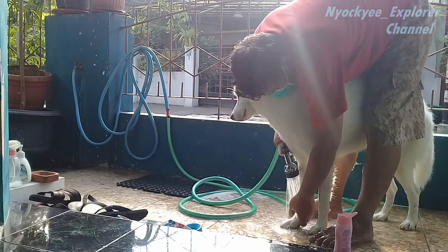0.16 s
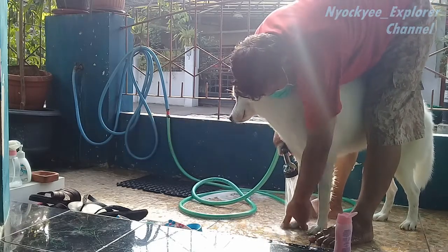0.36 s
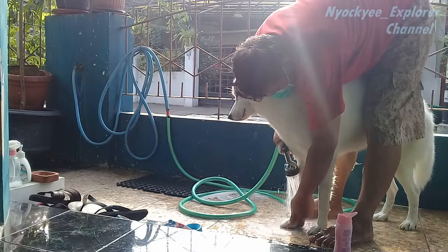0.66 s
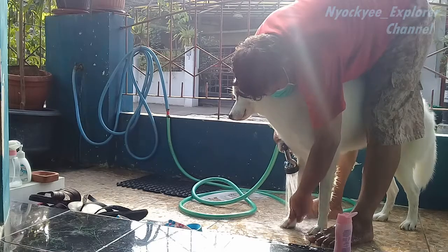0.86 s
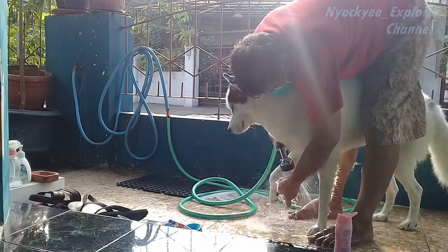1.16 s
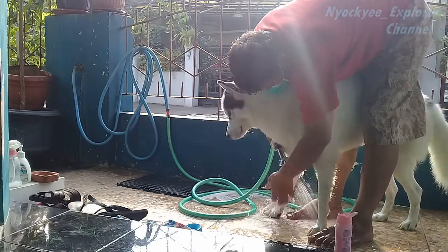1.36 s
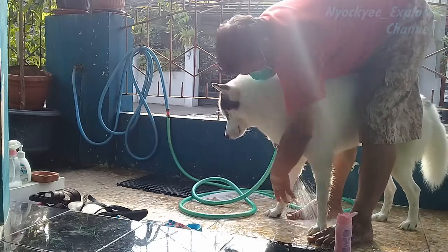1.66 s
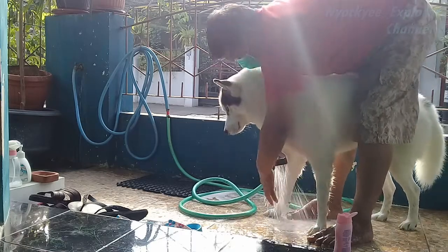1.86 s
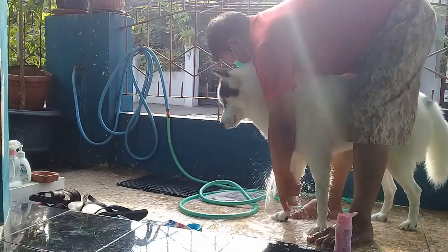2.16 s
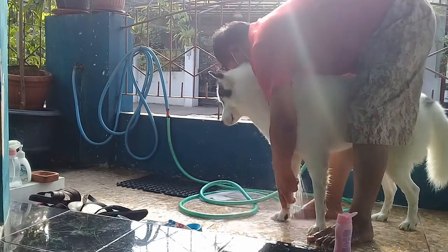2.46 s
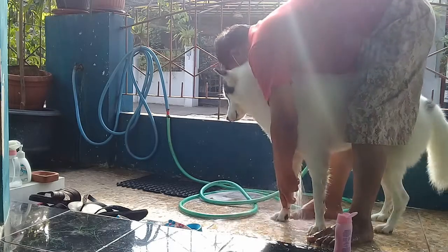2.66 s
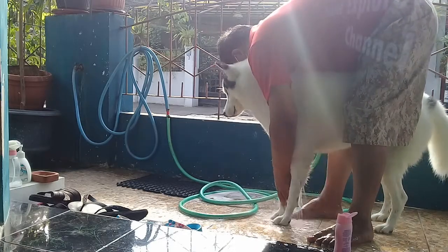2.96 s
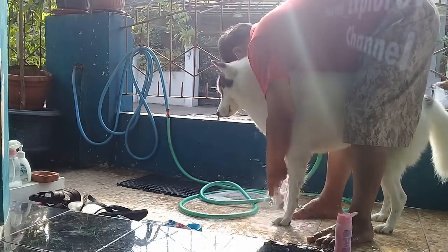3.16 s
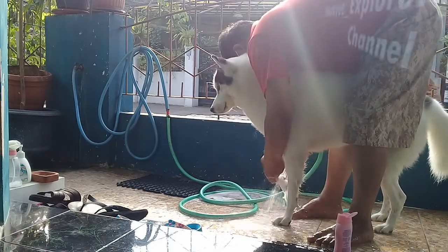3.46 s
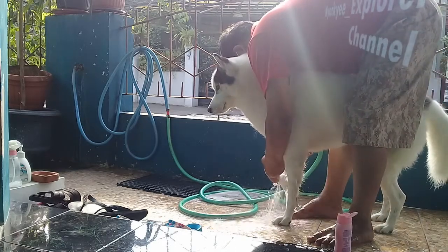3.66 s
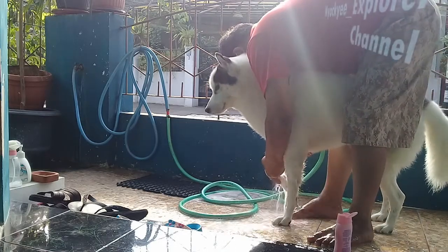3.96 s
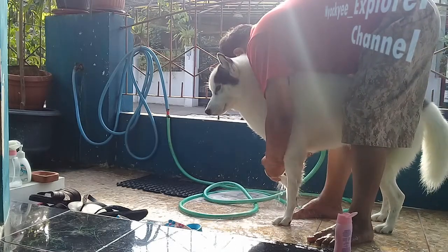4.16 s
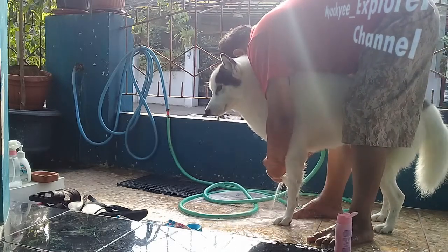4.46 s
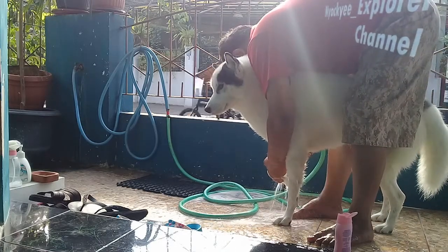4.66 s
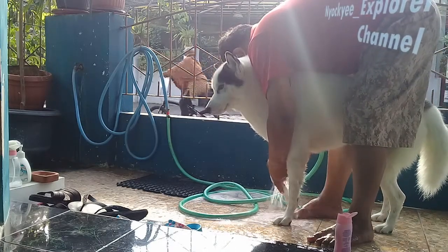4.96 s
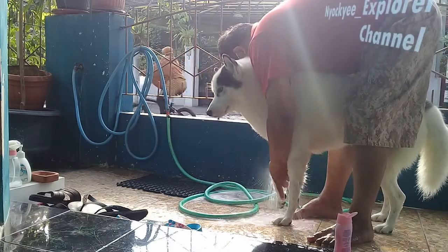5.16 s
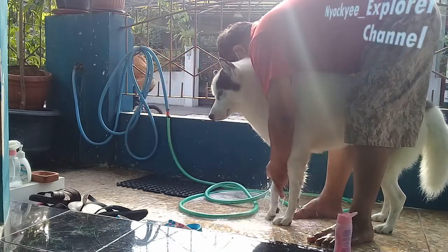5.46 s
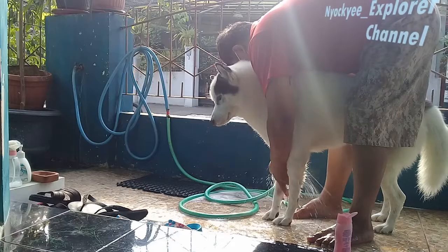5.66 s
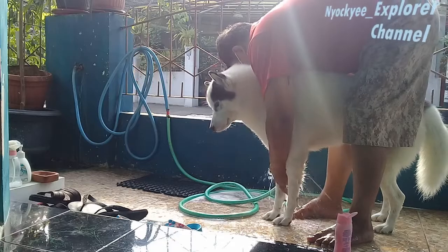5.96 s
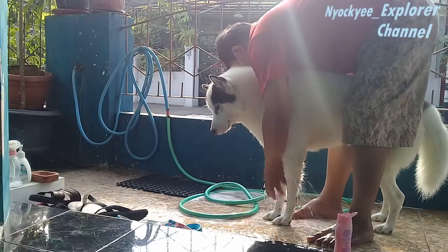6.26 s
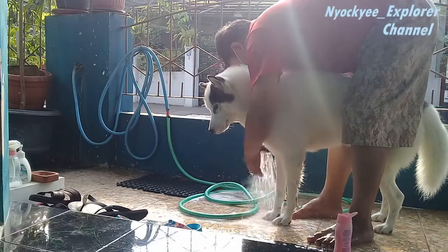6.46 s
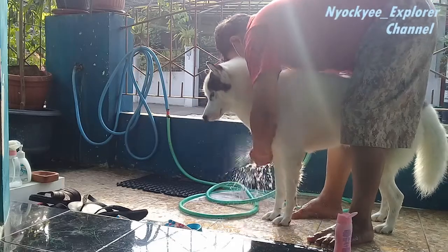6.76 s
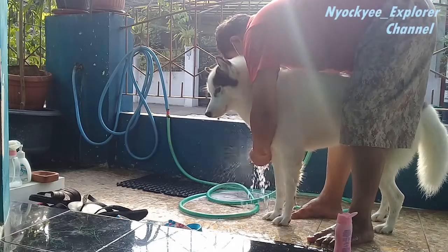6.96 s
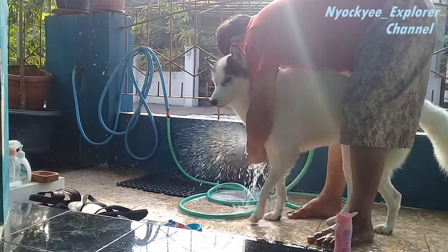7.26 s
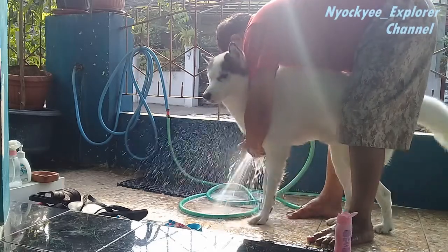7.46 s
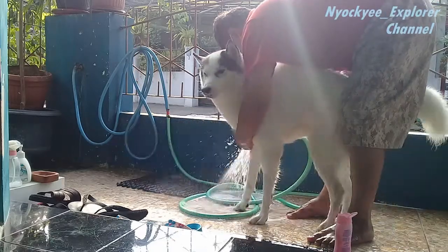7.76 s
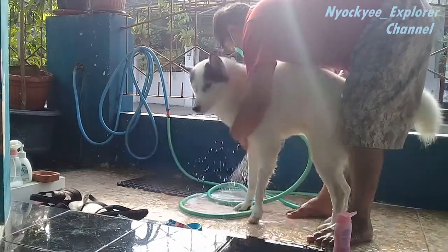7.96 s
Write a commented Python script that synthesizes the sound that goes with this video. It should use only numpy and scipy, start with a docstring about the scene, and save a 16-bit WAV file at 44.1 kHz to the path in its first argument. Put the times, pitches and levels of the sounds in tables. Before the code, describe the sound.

A hose sprays a dog's legs on a tiled terrace. Fine hiss and dense bubbly drops run throughout, with low gurgles early on, a quieter stretch around two seconds, then fuller pouring and plinking trickles. Sharp wet slaps crowd together in the last second or so. Far traffic rumble and a faint steady pump hum lie underneath. One fairly close microphone, centred, in a slightly reflective outdoor space.

```python
"""A tiled terrace above street rumble: a hose sprays a dog's legs, heard at one microphone while a pump hums.
The spray is ticking noise in bands; drops on the wet tiles, gurgles off the fur and trickles are ringing bubbles.
Water slaps down as a crack, a plink and a scattered ringing above it; single drops snap on stone.
Noise bands and drones make the far street, a wavering sine the pump.
The sound drops out once for a fiftieth of a second."""
import sys
import numpy as np
from scipy import signal
from scipy.io import wavfile

SR = 44100
rng = np.random.default_rng(int(sys.argv[2]) if len(sys.argv) > 2 else 0)


def boost(x):
    """Linear amplitude factor 10**(x/20) for a level x in decibels (scalar or array-like)."""
    u = np.asarray(x, float) / 20
    return 10 ** u


def digitize_waveform(pressure):
    """Quantize a signal to 16-bit integers and store it at the path in sys.argv[1].

    Rows of a 2-D input are taken as channels; values are limited to [-1, 1].
    """
    field = np.atleast_2d(pressure).T
    bounded = np.clip(field, -1, 1)
    quanta = np.round(bounded * 32767).astype(np.int16)
    wavfile.write(sys.argv[1], SR, quanta)


N = 357651

# Fine spray: start_s, level_db, tilt_db_per_octave
SPRAY = [(0, -49, -2), (.2, -50.5, -1), (.45, -53.5, 2), (.65, -50, -0.5), (1.08, -49, 2), (1.2, -46.5, -2),
         (1.44, -49.5, 0.5), (1.62, -51, 0), (1.76, -46, -1), (1.92, -42.5, 2), (2.05, -46.5, 0.5),
         (2.14, -48, 5), (2.22, -50.5, 2), (2.31, -47, 2), (2.39, -46.5, 1.5), (2.5, -49, -1),
         (3.07, -47, 0), (3.26, -49.5, -1.5), (3.34, -44, 1), (4.0, -44, 0), (4.18, -46.5, 0),
         (5.05, -44, -1.5), (5.25, -46.5, -2), (5.35, -51, -1), (5.55, -53, -1), (5.7, -52, 0.5),
         (5.88, -50.5, -3.5), (6.1, -50.5, -3), (6.3, -48, -3), (6.35, -50, -2.5), (6.37, -52.5, -3),
         (6.4, -50.5, -4), (6.5, -47.5, -0.5), (6.75, -53, -0.5), (7.05, -48, -3.5), (7.3, -51.5, 2),
         (7.48, -48, -3.5), (7.57, -43, 2.5), (7.72, -46, 1.5), (7.8, -42.5, -2), (8.02, -50, -2),
         (8.08, -55.5, -1.5)]
# Colour of the spray: pitch_hz, level_db_per_hz
SPRAY_COLOUR = [(1400, -14), (2370, -2), (3000, -7), (3570, -5.5), (5070, -2), (6800, -4), (8670, -4),
                (9740, -1), (15400, -5)]
# Drops bursting on the tiles: start_s, level_db, middle_pitch_hz, spread_octaves
DROPS = [(0, -53.5, 3640, 0.28), (.18, -56.5, 3060, 0.59), (.29, -47.5, 2400, 1.4),
         (.45, -53.5, 2250, 0.88), (.61, -51.5, 3580, 0.5), (.9, -54, 3200, 0.93), (1.04, -46.5, 2600, 1.4),
         (1.14, -56, 3580, 0.96), (1.45, -51, 3480, 0.7), (1.62, -52.5, 3380, 0.57),
         (1.95, -56, 4200, 0.54), (2.22, -51, 2720, 0.71), (2.39, -53.5, 4070, 1), (2.62, -49, 3020, 0.65),
         (3.1, -52, 3430, .65), (3.24, -52.5, 2720, 0.65), (3.33, -46.5, 2720, 0.6),
         (3.43, -43.5, 2600, 0.73), (3.66, -46.5, 2660, 0.79), (3.95, -47, 3000, 0.67),
         (4.18, -47, 3200, 0.65), (4.7, -46.5, 2980, 0.53), (5.17, -47, 3800, 0.54), (5.3, -54, 3300, 0.44),
         (5.5, -55.5, 2570, 0.84), (5.9, -53, 2900, 1.1), (6.15, -51.5, 3600, 1.3), (6.33, -52, 3000, .8),
         (6.37, -56, 2800, .6), (6.4, -53.5, 2820, 0.66), (6.58, -52.5, 4300, 0.42),
         (6.75, -63, 3950, 0.53), (6.9, -52.5, 3680, 0.42), (7.04, -51, 3380, 0.37),
         (7.15, -50, 3240, 0.41), (7.3, -53, 3550, 0.77), (7.48, -54.5, 3280, 0.79),
         (7.54, -51.5, 3700, 0.64), (7.68, -50.5, 3820, 0.71), (7.81, -46.5, 3800, 0.31),
         (8.02, -53, 3630, 0.39), (8.07, -65, 3400, 0.5)]
# Thick water running off the fur: start_s, level_db, middle_pitch_hz, spread_octaves
GURGLE = [(0, -54.5, 1380, 0.43), (.2, -56, 1350, 0.2), (.27, -49.5, 1450, .35), (.37, -46, 1490, 0.27),
          (.47, -53, 1390, 0.36), (.63, -57, 1320, 0.18), (.74, -61.5, 1330, 0.65), (.9, -60.5, 1260, 1),
          (1.05, -55.5, 1110, 0.54), (1.13, -58.5, 1340, .35), (1.26, -67, 1540, 0.23),
          (1.4, -62, 1490, 0.21), (1.7, -65.5, 1500, 0.26), (2.0, -62, 1460, 0.18), (2.33, -62.5, 1480, .3),
          (2.41, -56.5, 1420, 0.18), (2.55, -56.5, 1500, 0.34), (3.29, -62.5, 1480, 0.33),
          (3.39, -50, 1550, 0.6), (3.57, -51, 1590, 0.76), (3.92, -50.5, 1520, 0.34),
          (4.15, -56.5, 1410, 0.65), (4.88, -55, 1460, 0.29), (5.0, -52, 1600, 0.54),
          (5.1, -58, 1480, 0.24), (5.35, -54, 1510, 0.56), (5.62, -60, 1320, 0.71), (5.72, -56, 1490, 1),
          (6.05, -61, 1450, 0.6), (6.36, -58.5, 1400, 0.6), (6.43, -61.5, 1580, 0.26),
          (6.7, -67, 1610, 0.13), (7.35, -64.5, 1600, 0.25), (7.72, -69.5, 1560, 0.54),
          (7.85, -59, 1540, 0.45), (8.08, -73, 1330, 0.86)]
# Far traffic: start_s, level_db
TRAFFIC = [(0, -54), (.6, -52), (1.3, -53), (2.7, -53.5), (3.6, -53), (4.2, -53), (5.7, -55), (6.3, -54.5),
           (7.5, -54), (8.11, -53.5)]
# Colour of the street rumble: pitch_hz, level_db_per_hz
RUMBLE = [(25, -22), (38, 5), (49, -36), (62, -2), (75, 0.5), (107, 4), (200, -5), (240, -7.5), (300, -9),
          (440, -10.5), (580, -18.5), (800, -24), (1300, -54)]
# Drones in the street: pitch_hz, width_hz (each rings 5 / width seconds), level_db beside the rumble
DRONES = [(101.2, 8.5, -8.5), (298.3, 8.8, -17), (339.6, 9.1, -23)]
# Pump hum: start_s, pitch_hz, level_db
PUMP = [(0, 386.3, -54.5), (2.5, 387.1, -56), (5.6, 386.9, -55.5), (6.8, 386.2, -54), (8.11, 387.4, -53.5)]
# Trickles pouring into one hollow each: middle_s, half_length_s, pitch_hz, level_db at the middle
TRICKLES = [(.3, 0.1, 1100, -53.5), (0.27, 0.04, 1600, -55), (0.38, 0.036, 2250, -58),
            (0.12, 0.087, 1420, -62), (0.35, .05, 1600, -57), (.27, 0.044, 2300, -58),
            (0.4, 0.033, 1700, -58), (0.48, .04, 1450, -59), (.49, .02, 2280, -58),
            (.605, .008, 1290, -50.5), (0.63, 0.044, 1300, -64), (0.78, 0.18, 830, -70),
            (1.043, 0.03, 830, -57), (1.01, 0.048, 1280, -57), (1.32, 0.016, 1500, -57.5),
            (1.9, .1, 1450, -67), (2.03, 0.037, 1350, -62), (2.42, 0.038, 1400, -60),
            (3.8, 0.036, 2900, -51), (3.46, 0.043, 1970, -52), (3.5, 0.027, 1300, -54),
            (3.55, 0.03, 1800, -51), (3.63, 0.056, 2100, -49.5), (3.62, 0.033, 4300, -51),
            (3.76, .025, 4550, -53), (3.81, .02, 4350, -51), (3.9, .03, 2150, -50.5),
            (3.96, .03, 4300, -54), (4.88, .03, 2300, -51.5), (4.98, 0.028, 1680, -50),
            (5.44, 0.14, 1510, -61), (5.73, 0.054, 1650, -57.5), (5.8, 0.22, 2420, -63),
            (5.86, .3, 1620, -68), (5.8, .25, 3400, -71), (5.4, 0.18, 870, -68), (5.82, .05, 3380, -64),
            (6.01, 0.023, 2200, -56), (6.348, .01, 2040, -47), (6.65, .2, 1530, -69.5),
            (6.6, 0.025, 860, -67), (5.5, 0.018, 2100, -62), (5.3, .04, 2430, -62), (6.8, .06, 3700, -58)]
# Slaps of water, some followed by an early echo in a row of its own:
# start_s, peak_db, plink_pitch_hz, crack_db beside the peak
SLAPS = [(.163, -36, 2400, -22), (.237, -35, 2330, -24), (.303, -32, 2600, -22), (.385, -35, 2200, -22),
         (.578, -35, 2150, -22), (1.268, -33, 4000, -15), (1.272, -37, 5500, -20), (1.3093, -33, 2170, -1),
         (1.377, -27, 5200, -17), (1.393, -35, 3430, -18), (1.429, -32, 3450, -15), (1.485, -33, 2500, -5),
         (1.545, -32, 2600, -19), (1.63, -36, 3620, -4), (1.695, -36, 2350, -19), (1.79, -29, 3120, -14),
         (1.841, -27, 5380, -16), (2.116, -33.5, 2100, -11), (2.597, -26, 3900, -20),
         (2.5995, -27.5, 3500, -24), (2.6017, -29, 3950, -24), (2.912, -31, 4300, -16),
         (3.143, -26, 2630, -16), (3.161, -29, 2550, -20), (3.2605, -34.5, 2670, -18),
         (3.367, -27, 4900, -18), (3.57, -35, 4270, -14), (3.711, -23, 3350, -11), (3.73, -29, 3900, -12),
         (5.008, -29, 3600, -12), (5.095, -33, 2950, -18), (5.124, -30, 2750, -18), (5.171, -24, 3330, -13),
         (5.173, -30, 2650, -18), (5.195, -31, 3430, -20), (5.271, -27, 3600, -12),
         (5.5904, -32, 2460, -14), (5.912, -33, 5300, -10), (5.9298, -25.5, 2700, -9),
         (5.9355, -32, 5200, -12), (5.946, -36, 2850, -18), (5.951, -40, 2350, -18),
         (5.984, -39, 2650, -18), (6.071, -28.5, 4300, -10), (6.104, -33, 4100, -14),
         (6.1605, -27, 3380, -12), (6.319, -30, 2080, -16), (6.34, -31, 2090, -22), (6.412, -30, 5300, -12),
         (6.413, -35, 3000, -11), (6.433, -33, 5000, -14), (6.587, -31, 5300, -8), (6.795, -28, 4500, -10),
         (6.826, -26, 3790, -23), (7.025, -34, 3120, -16), (7.031, -38, 4220, -15), (7.072, -24, 3000, -16),
         (7.079, -20, 3050, -17), (7.082, -26, 3100, -7), (7.095, -28, 3000, -20), (7.1112, -19, 3360, -16),
         (7.1165, -26, 3680, -12), (7.13, -34, 3500, -20), (7.145, -27, 3300, -20),
         (7.1932, -25.5, 6700, -5), (7.193, -34, 1750, -20), (7.2265, -35, 4600, -8),
         (7.292, -34, 2400, -15), (7.319, -27.5, 3830, -16), (7.3547, -25, 4270, -17),
         (7.379, -23.5, 3430, -12), (7.397, -27, 2980, -14), (7.5395, -25.5, 3900, -10),
         (7.568, -29, 4320, -12), (7.5932, -22.5, 2800, -18), (7.601, -34, 2880, -24),
         (7.613, -31, 2750, -20), (7.632, -25, 4050, -20), (7.649, -26, 4200, -17), (7.672, -26, 6500, -6),
         (7.745, -32, 4200, -16), (7.759, -30, 3300, -18), (7.764, -34, 2950, -20), (7.78, -29, 3520, -16),
         (7.815, -29, 2950, -14), (7.836, -27, 3900, -15), (7.845, -29, 3450, -10), (7.888, -30, 3470, -15),
         (7.91, -32, 3700, -10), (7.957, -33, 3300, -10), (8.095, -21.5, 3900, -8)]
# Echoes of every slap off the floor and the near wall: delay_s, level_db
ECHOES = [(.0048, -10), (.0105, -14)]
# The jet swings onto the tiles or a sheet of water lands: start_s, drops_jump_db, spray_jump_db, fall_s
SPLASHES = [(1.31, 5, 1.5, 0.032), (1.678, -3, 5, 0.071), (2.238, 2.5, 5, 0.11), (3.14, 6, 0.5, 0.073),
            (5.928, 3, 3, 0.019), (6.412, 7, 6.5, 0.17), (6.795, 1.5, 2.5, 0.11), (7.073, 3, 1.5, 0.046),
            (7.376, 15.5, 1.5, 0.088)]
# Single drops snapping on stone: start_s, click_peak_db (before the lows are cut)
SNAPS = [(1.3234, -35), (1.427, -27), (1.6771, -31), (1.7084, -27), (1.8134, -37), (1.8434, -34),
         (1.9144, -29), (1.9614, -29), (3.065, -24), (3.3714, -36), (6.4114, -39), (7.057, -27),
         (7.1154, -26), (7.1896, -34), (7.67, -30), (7.9887, -26), (8.0092, -21)]
# Hollows that the water rings in: pitch_hz, width_hz, gain_db
PUDDLES = [(1350, 21, 2), (1540, 18, 2.5), (2400, 44, 1), (3300, 25, -0.5), (4100, 84, 3)]

# fine wavering tones in the treble of the hiss: level beside the spray, middle pitch, spread, onsets
TREBLE_DB, TREBLE_HZ, TREBLE_OCTAVES, TREBLE_PER_S = -13, 6500, 1.5, 500
DROPS_PER_S = 6000   # at full flow; fewer as it weakens
# the weaker the drops under this level, the more drops and spray wobble
WOBBLE_DB_PER_DB, STEADY_DB = 0.0666, -44.5
GURGLE_SHARE = 0.18   # of the drops' jump
TRICKLE_CYCLES = 82   # to decay by 60 dB
SCATTER_T60_S, CRACK_T60_S = 0.057, 0.0034   # scattered impacts after a slap; the wide crack that opens it
TERRACE_T60_S, TERRACE_DB = .14, -10
CUTOFF_HZ = 15750
DROPOUT_START_S, DROPOUT_END_S = 6.9575, 6.9786


def rms_one(x):
    """Scale to rms 1."""
    return x / np.sqrt(np.mean(x ** 2) + 1e-20)


def in_time(rows):
    """Columns of a table after the time, one value per sample."""
    s, *columns = np.transpose(rows)
    return [np.interp(np.arange(N) / SR, s, c) for c in columns]


def drift(rate_hz):
    """Slow random wander of spread 1: noise through two equal low-pass poles."""
    r = np.exp(-80 * np.pi * rate_hz / SR)   # one value every 40 samples
    noise = rng.standard_normal(N // 40 + 2002)
    slow = signal.lfilter([1], [1, -2 * r, r * r], noise)[2000:]   # skip the settling
    return np.interp(np.arange(N) / 40, np.arange(len(slow)), rms_one(slow))


def ring(clicks, hz, t60_s):
    """A resonator: a unit click sets a sine of about height 1 ringing, which decays by 60 dB in t60_s."""
    r, w = boost(-60 / (t60_s * SR)), 2 * np.pi * hz / SR
    return signal.lfilter([0, np.sin(w)], [1, -2 * r * np.cos(w), r * r], clicks + 1e-18)


def high_pass(x, hz):
    """Steep cut of the lows."""
    return signal.sosfilt(signal.butter(6, hz, "high", fs=SR, output="sos"), x)


def grains(per_s, spread_db):
    """Random impacts of uneven size and sign."""
    sizes = boost(spread_db * np.minimum(rng.exponential(1, N), 3.5))
    signs = rng.choice([-1, 1], N)
    return sizes * signs * (rng.random(N) < per_s / SR)


def banded(sources, spectrum, edges, gains_db):
    """Split noise into bands, from two sources in turn, each set to the spectrum and moved by its own gain."""
    out = 0
    at_hz, level_db = np.transpose(spectrum)
    for k, (low, high) in enumerate(zip(edges, edges[1:])):
        hz = np.sqrt(low * high)
        sos = signal.butter(2, [low, high], "band", fs=SR, output="sos")
        band = signal.sosfilt(sos, sources[k % 2])
        band_db = np.interp(np.log(hz), np.log(at_hz), level_db)
        out = out + band * boost(band_db + gains_db(hz))
    return rms_one(out)


def short_rings(controls, pitches, per_s, spread_db, cycles, surge_db, patchy_db):
    """Impacts each ring some cycles at one pitch; those near the middle are loudest, each comes and goes."""
    level_db, middle_hz, octaves = controls
    born = grains(per_s, spread_db)
    dealt = rng.integers(0, len(pitches), N)   # which pitch an impact sets ringing
    shares = []
    for hz in pitches:
        distance = np.log2(hz / middle_hz) / np.maximum(octaves, .1)
        shares.append(np.exp(-.5 * distance ** 2) * boost(patchy_db * drift(9.0)))
    total = np.sqrt(sum(share ** 2 for share in shares))
    rings = 0
    for k, hz in enumerate(pitches):
        impacts = born * (dealt == k) * shares[k] / total * np.sqrt(hz)
        rings = rings + ring(impacts, hz, cycles / hz)
    return boost(level_db + surge_db) * rms_one(rings)


def spurts(per_s, height_db, fall_s):
    """The flow jumps at once and sinks back more slowly; dB with mean 0 and rms height_db."""
    kicks = np.abs(grains(per_s, spread_db=-2.0))
    jumps = signal.lfilter([1], [1, -np.exp(-1 / (fall_s * SR))], kicks)
    return height_db * rms_one(jumps - jumps.mean())


def spray(surge_db):
    """Thousands of droplets a second tick over a smooth hiss, with fine wavering tones in its treble."""
    level_db, tilt_db = in_time(SPRAY)
    ticks = [rms_one(grains(9000, spread_db=1.0)) * 0.5 + 0.89 * rng.standard_normal(N)
             for source in range(2)]
    edges = np.geomspace(1400, 17000, num=19)
    hiss = banded(ticks, SPRAY_COLOUR, edges,
                  lambda hz: tilt_db * np.log2(hz / 10000) + 0.69 * drift(18))
    treble = level_db + TREBLE_DB, TREBLE_HZ, TREBLE_OCTAVES
    tones = short_rings(treble, np.geomspace(2500, 15000, num=22), TREBLE_PER_S, spread_db=3.0,
                        cycles=70.0, surge_db=surge_db, patchy_db=2.5)
    return boost(level_db + surge_db) * hiss + tones


def drops(falling, wobble_db, surge_db):
    """Small drops ring as bubbles of trapped air, with larger, sparser ones pattering among them."""
    pitches = np.geomspace(1400, 8000, num=24)
    per_s = DROPS_PER_S * boost(-3.0 * wobble_db)
    small = short_rings(falling, pitches, per_s, spread_db=-0.05, cycles=30.0,
                        surge_db=surge_db, patchy_db=0.15 + 1.6 * wobble_db)
    patter = short_rings(falling, pitches, 70, spread_db=3.0, cycles=35.0, surge_db=-14, patchy_db=0)
    return high_pass(small + patter, 1480)


def gurgle(splash_db, surge_db):
    """Thicker water off the fur traps bubbles that ring lower, and follows the splashes only in part."""
    level_db, *pitch = in_time(GURGLE)
    running = level_db + GURGLE_SHARE * splash_db + 0.48 * drift(5.6), *pitch
    low = short_rings(running, np.geomspace(550, 2400, num=18), 2500, spread_db=-1.0, cycles=33.0,
                      surge_db=0.11 * surge_db, patchy_db=1.1)
    return high_pass(low, 520)


def street():
    """Far traffic rumble in drifting noise bands, with a few drones: noise in narrow resonators."""
    edges = np.geomspace(22, 1400, num=19)
    rumble = banded(rng.standard_normal((2, N)), RUMBLE, edges, lambda hz: 2.16 * drift(5.0))
    drones = sum(boost(db) * rms_one(ring(rng.standard_normal(N), hz, 5.0 / width_hz))
                 for hz, width_hz, db in DRONES)
    return boost(in_time(TRAFFIC)[0]) * (high_pass(rumble, 50.3) + drones)


def pump():
    """A steady tone that wavers a little in level and pitch."""
    hz, level_db = in_time(PUMP)
    waver_db = .9 * drift(3.0)
    phase = 2 * np.pi * np.cumsum(hz + 0.17 * drift(3.4)) / SR
    return np.sqrt(2) * boost(level_db + waver_db) * np.sin(phase)


def trickles():
    """Bubbles born in one hollow share its pitch; the stream swells and fades."""
    t, born = np.arange(N) / SR, grains(1200, spread_db=0.5)
    out = np.zeros(N)
    for k, (s, half_s, hz, db) in enumerate(TRICKLES):
        swell = np.exp(-.5 * ((t - s) / half_s) ** 2)
        impacts = np.roll(born, 999 * k)   # other moments for each hollow
        out += boost(db) * swell * rms_one(ring(impacts, hz, TRICKLE_CYCLES / hz))
    return out


def slaps():
    """A crack, a plink swelling over a cycle or two, a scattered ringing half an octave above it, two echoes."""
    out, t = np.zeros(N), np.arange(SR // 3) / SR
    scatter, hiss = rms_one(grains(4000, spread_db=3.5)), rng.choice([-1, 1], N)
    for s, peak_db, hz, crack_db in SLAPS:
        at = round(s * SR)
        left = t[:N - at]
        burst = scatter[at:at + len(t)] * boost(-25.5 - 60 * left / SCATTER_T60_S)
        scattered = ring(burst, 1.52 * hz, 11.0 / hz)
        opening = hiss[at:at + len(t)] * boost(crack_db - 60 * left / CRACK_T60_S)
        crack = ring(opening, 1.3 * hz, 1.6 / hz)
        burst[0] = 1   # the impact itself
        # a long resonator into a short one: the swell
        plink = ring(ring(burst, hz, 33.7 / hz), hz, 2.68 / hz) * 2.01 * hz / SR
        out[at:at + len(t)] += boost(peak_db) * (plink + 0.39 * scattered + crack)
    out = out + sum(boost(db) * np.pad(out, (round(s * SR), 0))[:N] for s, db in ECHOES)
    return high_pass(out, 1510)


def splashes():
    """Level jumps in dB, of drops and of spray, that die away exponentially, each at its own pace."""
    t = np.arange(N) / SR
    jumps = np.zeros((2, N))
    for s, drops_db, spray_db, fall_s in SPLASHES:
        fall = (t >= s) * np.exp(-np.maximum(t - s, 0) / fall_s)
        jumps += np.outer([drops_db, spray_db], fall)
    return jumps


def snaps():
    """A click, then bright noise with a quick decay and a slower one."""
    clicks = np.zeros(N)
    for s, peak_db in SNAPS:
        clicks[round(s * SR)] = boost(peak_db)
    fast, slow = [signal.lfilter([1], [1, -boost(-60 / (t60_s * SR))], clicks) for t60_s in (.006, .05)]
    return high_pass(clicks + (0.21 * fast + 0.12 * slow) * rng.standard_normal(N), 6700)


def terrace(x):
    """A few hollow resonances, then a short diffuse tail from an answer of unit energy."""
    for hz, width_hz, db in PUDDLES:
        x = x + (boost(db) - 1) * signal.lfilter(*signal.iirpeak(hz, hz / width_hz, fs=SR), x)
    t = np.arange(SR // 2) / SR
    tail = rng.standard_normal(len(t)) * boost(-60 * t / TERRACE_T60_S) * (t > .008)
    answer = boost(TERRACE_DB) * tail / np.sqrt(np.sum(tail ** 2))
    answer[0] = 1   # direct sound
    return signal.fftconvolve(x, answer / np.sqrt(np.sum(answer ** 2)))[:N]


def scene():
    """The jet spurts and splashes; spray and small drops follow fully, the gurgle in part."""
    surge_db = spurts(70, height_db=.75, fall_s=.012)
    splash_db, spray_splash_db = splashes()
    drop_db, *drop_pitch = in_time(DROPS)
    wobble_db = WOBBLE_DB_PER_DB * np.clip(STEADY_DB - drop_db, 0, 12)
    mist = spray(surge_db + spray_splash_db + wobble_db * drift(5.0))
    falling = drop_db + splash_db + wobble_db * drift(3.5), *drop_pitch
    water = drops(falling, wobble_db, surge_db) + gurgle(splash_db, surge_db) + trickles() + slaps()
    mono = high_pass(mist, 2110) + terrace(water) + street() + pump() + snaps()
    return np.stack([mono, mono])


def band_limit(x):
    """A steep low-pass at the top of the band."""
    return signal.sosfilt(signal.butter(12, 16730, fs=SR, output="sos"), x)


def record(dry):
    """One microphone on both channels: the top is cut steeply and the sound drops out briefly."""
    t = np.arange(N) / SR
    cut = signal.sosfilt(signal.ellip(14, .3, 75, CUTOFF_HZ, fs=SR, output="sos"), dry)
    mix = cut * ((t < DROPOUT_START_S) | (t > DROPOUT_END_S))
    return band_limit(mix)


dry = scene()
out = record(dry)
digitize_waveform(out)
```